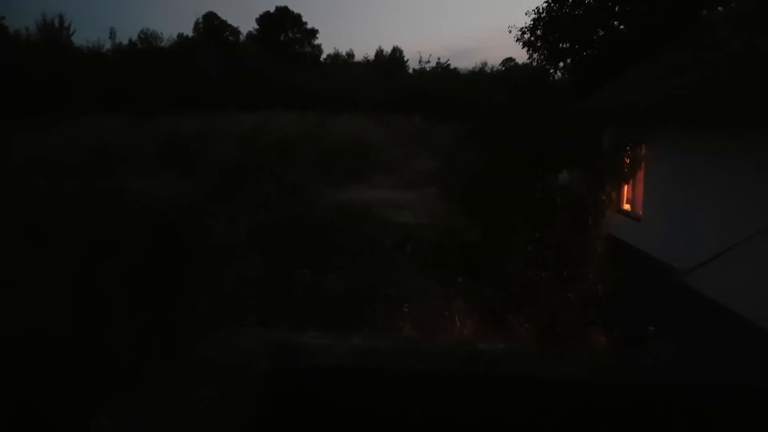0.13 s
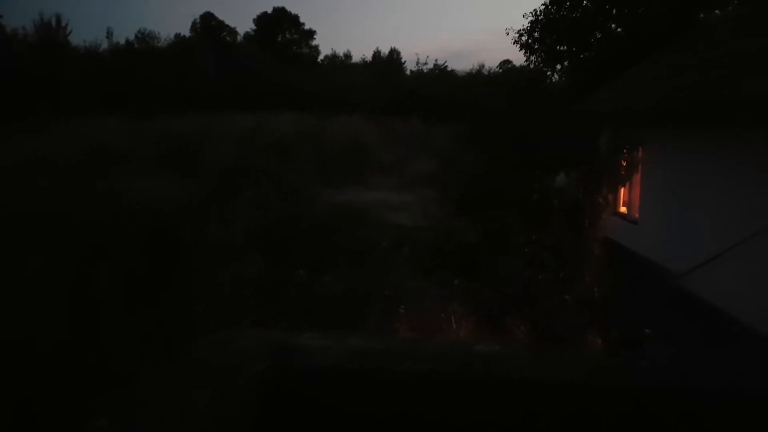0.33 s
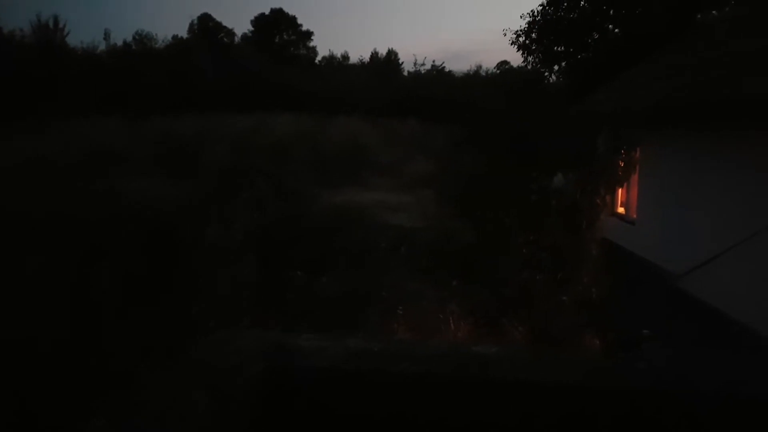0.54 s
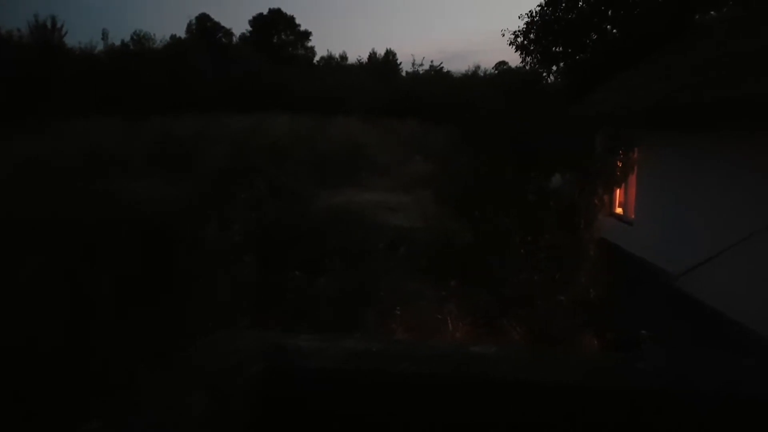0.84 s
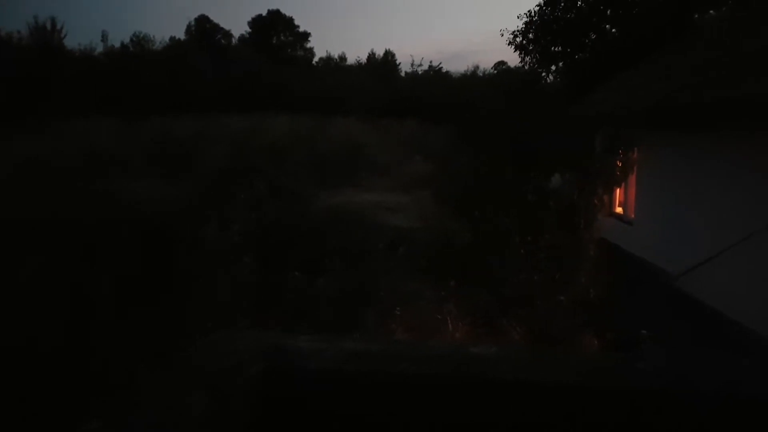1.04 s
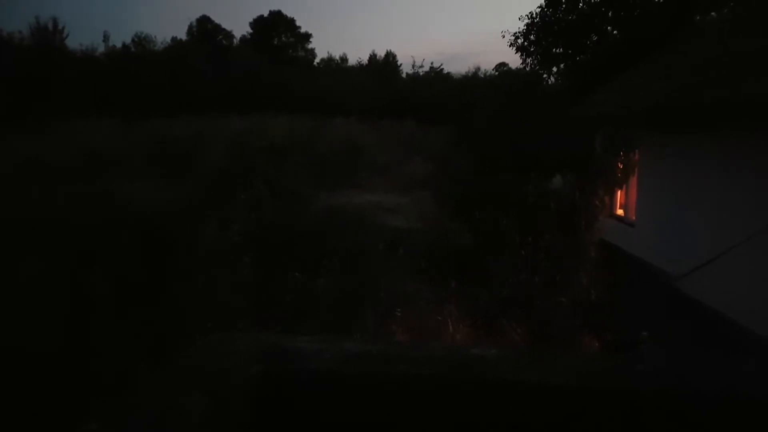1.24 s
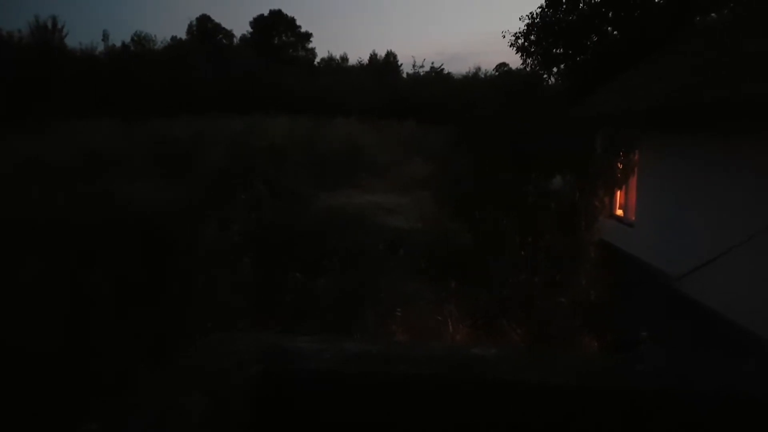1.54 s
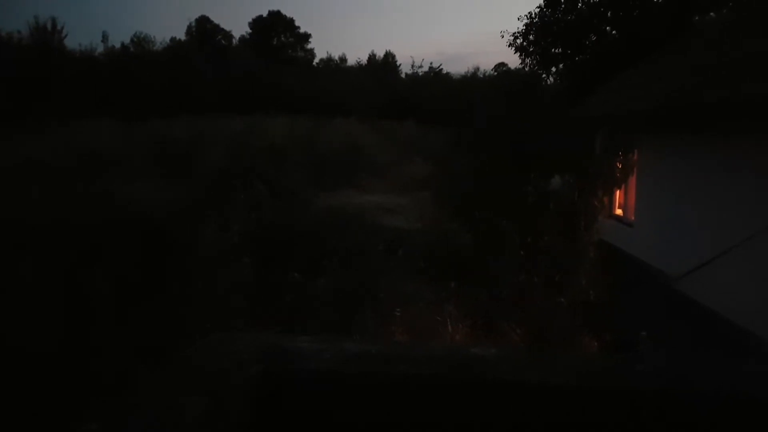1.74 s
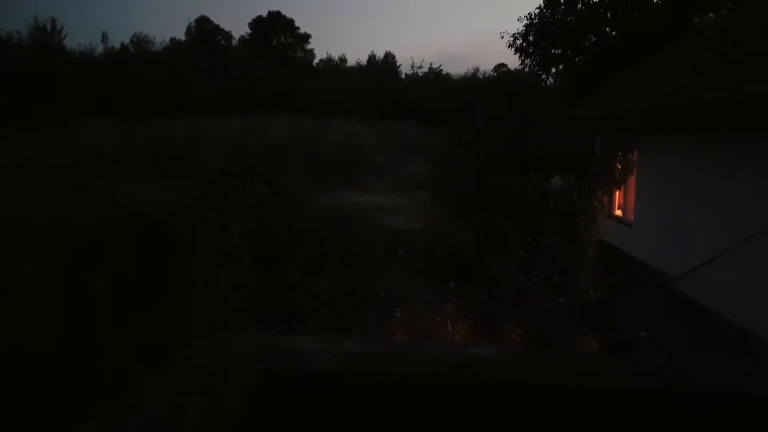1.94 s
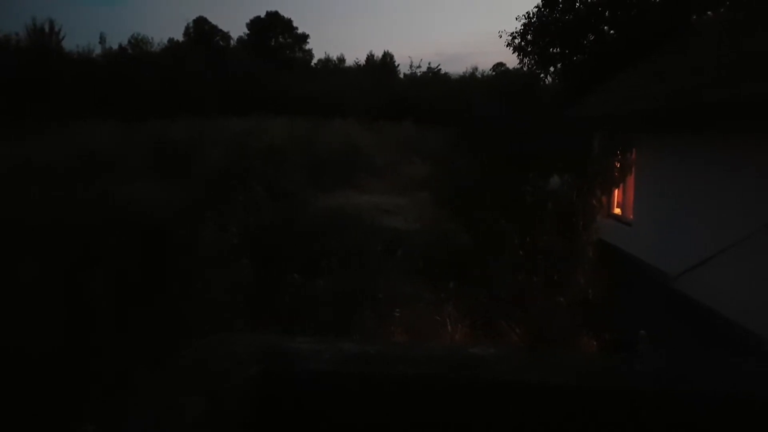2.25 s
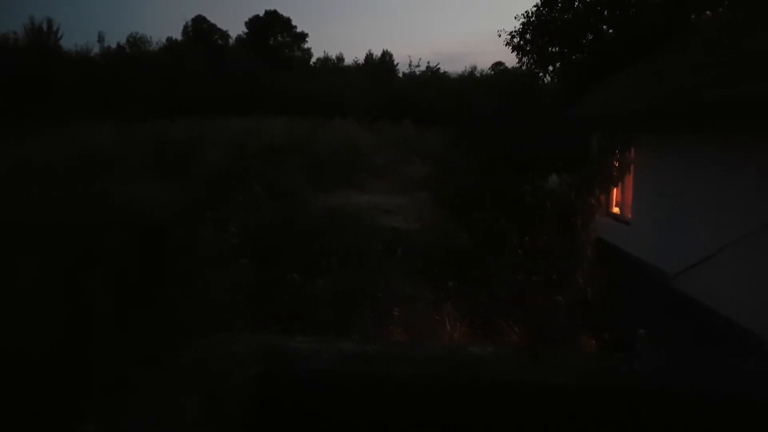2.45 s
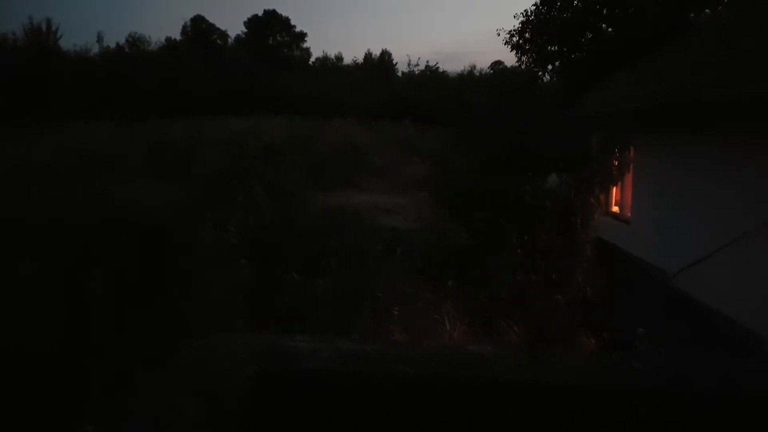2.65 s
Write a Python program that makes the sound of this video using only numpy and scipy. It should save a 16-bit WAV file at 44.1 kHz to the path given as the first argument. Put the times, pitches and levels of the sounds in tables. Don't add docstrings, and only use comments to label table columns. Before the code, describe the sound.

Tree crickets trill softly in overlapping bouts across a quiet garden at dusk, with faint hiss

```python
import sys
import numpy as np
from scipy import signal
from scipy.fft import rfft, irfft, next_fast_len
from scipy.io import wavfile
from scipy.ndimage import map_coordinates

SR = 44100
rng = np.random.default_rng(int(sys.argv[2]) if len(sys.argv) > 2 else 0)


def natural_amplitude(level_db):
    exponent = np.asarray(level_db, float) / 20
    return 10 ** exponent


def dump(signal):
    limited = np.clip(np.atleast_2d(signal).T, -1, 1)
    pcm = np.round(limited * 32767).astype(np.int16)
    wavfile.write(sys.argv[1], SR, pcm)


N = 123039

# singer, start in seconds, length in seconds, level in dB, left over right in dB.
TRILLS = [("a", -.3, .52, -73, -4), ("b", -.1, .32, -76.5, -5), ("c", -.2, .53, -79, -3),
          ("d", .22, .34, -78, -3), ("e", .47, .12, -81, -4), ("a", .54, .28, -75, -9),
          ("d", .58, .45, -79.5, 2), ("a", .8, .25, -77, -5), ("f", .74, .3, -81, -2),
          ("b", 1.03, .3, -78.5, -3), ("a", 1.2, .72, -76, 0), ("b", 1.38, .55, -74.5, -8),
          ("c", 1.74, .58, -80, 1), ("a", 1.95, .55, -79.5, -4), ("g", 2.34, .3, -80, 1),
          ("a", 2.47, .45, -73, -6), ("b", 2.52, .4, -76, -6), ("h", 2.5, .24, -79, -3)]
WING_HZ = dict(a=2515, b=2566, c=2710, d=2540, e=2760, f=2620, g=2460, h=2655)
# start in seconds, length in seconds, gap between clicks in seconds, level in dB.
ZIPS = [
    (.33, .03, .006, -65),
    (.645, .045, .006, -59.5),
    (1.1555, .038, .0054, -53.5),
    (1.262, .02, .006, -59.5),
    (2.12, .02, .006, -63),
    (2.5232, .045, .014, -51),
]
# multiple of the fundamental, level in dB, phase wander in radians.
HUM_ORDERS = [
    (2, -8.5, 1.5),
    (3, -1.5, 0.21),
    (4, -11, 1.4),
    (6, -12.5, 1.8),
]
# frequency in Hz, level in dB.
RUMBLE = [(15, -65), (30, -8), (50, -0.5), (75, -6), (140, -3.5), (260, -7), (450, -13.5), (900, -43.5)]
# frequency in Hz, correlation from 0 to 1.
RUMBLE_ALIKE = [(30, .85), (55, .6), (80, .2), (150, .4), (400, .1)]
# frequency in Hz, level in dB.
HISS = [(60, -16.5), (300, 1), (2100, -5), (3300, -10), (6000, -18), (9500, -21.5), (12500, -16),
        (15500, -12.5)]
OFFSET = [
    [-.00038],
    [-.0004],
]

STROKES_PER_S, FASTER_PER_HZ, REFERENCE_HZ = 33, .025, 2512
SOUNDING = .68
SAG_HZ, SCATTER_DB, SLIP_RAD, UNEVEN = 100, 1.5, 1.3, .05
SWELL_S, FADE_S, OVERTONE_DB = 0.026, 0.025, -28.5
NEAR_DB = -0.5
FAR_LOW_HZ, FAR_HIGH_HZ, FAR_DB, FAR_BOUT_S = 2410, 2830, -90, .55
LEAVES_T60_S, LEAVES_DB = .22, -.5
HUM_HZ, HUM_DB, HUM_LEFT_DB = 61.65, -77.5, -5.5
RUMBLE_DB = -73.5
WIND_FILTER_DB, HUM_FREE_S, RUMBLE_FREE_S = -14.5, .26, 0.51
HISS_DB, HISS_LEFT_DB = -69.5, -1.3
HISS_SETTLE_DB, HISS_SETTLE_S = 0.66, .8
ZIP_HZ, ZIP_T60_S, ZIP_RASP_DB, FAST_GAP_S, ZIP_LEFT_DB = 15200, .0016, -24, .006, -3
TOP_HZ = 15770


def unit(x):
    return x / np.sqrt(np.mean(x ** 2) + 1e-20)


def along(points, hz):
    f, v = np.transpose(points)
    return np.interp(np.log(hz + 1), np.log(f + 1), v)


def wobble(rate):
    return map_coordinates(rng.standard_normal(300), [np.arange(N) * rate / SR])


def sides(left_db):
    return natural_amplitude(np.array([[left_db / 2], [-left_db / 2]]))


def rush(spectrum, alike):
    m = next_fast_len(N)
    hz = np.fft.rfftfreq(m, 1 / SR)
    turn = np.arccos(np.clip(along(alike, hz), -1, 1)) / 2
    noise = rfft(rng.standard_normal((2, m)))
    coloured = noise * natural_amplitude(along(spectrum, hz)) * [np.cos(turn), np.sin(turn)]
    mid, side = irfft(coloured, m)[:, :N]
    return unit(np.array([mid + side, mid - side]))


def leaves(x):
    t = np.arange(SR // 3) / SR
    tail = rng.standard_normal((2, len(t))) * natural_amplitude(-60 * t / LEAVES_T60_S)
    tail = natural_amplitude(LEAVES_DB) * tail / np.linalg.norm(tail[0])
    tail[[0, 1], rng.integers(0, 18, size=2)] += 1
    heard = signal.fftconvolve(x[None], tail, axes=1)
    return heard * np.linalg.norm(x) / np.linalg.norm(heard, axis=1, keepdims=True)


def trill(hz, start, length, db, left_db):
    t = np.arange(SR) / SR
    knots = rng.standard_normal((80, 3))
    rate = STROKES_PER_S + FASTER_PER_HZ * (hz - REFERENCE_HZ)
    strokes = 1 + t * rate + UNEVEN * np.interp(t * rate / 2, np.arange(80), knots[:, 2])
    k = strokes.astype(int)
    within = strokes % 1
    pitch = hz + SAG_HZ * (SOUNDING / 2 - within)
    phase = 2 * np.pi * np.cumsum(pitch) / SR + SLIP_RAD * np.cumsum(knots[:, 0])[k]
    pulse = np.abs(np.sin(np.pi * np.clip(within / SOUNDING, 0, 1))) ** 0.53
    stroke = pulse * natural_amplitude(SCATTER_DB * knots[k, 1])
    tone = np.sin(phase) + natural_amplitude(OVERTONE_DB) * np.sin(2 * phase)
    bout = np.clip(t / SWELL_S, 0, 1) * np.clip((length - t) / FADE_S, 0, 1)
    sound = leaves(bout * unit(stroke * tone))
    out = np.zeros((2, N + 3 * SR))
    out[:, SR + round(start * SR):][:, :sound.shape[1]] = natural_amplitude(db) * sides(left_db) * sound
    return out[:, SR:SR + N]


def near_crickets():
    return natural_amplitude(NEAR_DB) * sum(trill(WING_HZ[name], *rest) for name, *rest in TRILLS)


def far_chorus():
    chance = rng.uniform(size=(50, 3))
    starts = np.linspace(-.5, N / SR, len(chance))
    out = np.zeros((2, N))
    for start, (louder, place, higher) in zip(starts, chance):
        hz = FAR_LOW_HZ + (FAR_HIGH_HZ - FAR_LOW_HZ) * higher ** 1.5
        out += trill(hz, start, FAR_BOUT_S, FAR_DB + 4 * louder, 8 * place - 8)
    return out


def wind_filter(free_s):
    return natural_amplitude(WIND_FILTER_DB * np.exp(-(np.arange(N) / SR / free_s) ** 2))


def hum():
    phase = 2 * np.pi * np.cumsum(HUM_HZ + .05 * wobble(3.3)) / SR
    lines = np.zeros((2, N))
    for side in range(2):
        for k, db, wander in HUM_ORDERS:
            level = natural_amplitude(db + 1.2 * wobble(4))
            lines[side] += level * np.sin(k * phase + 1.2 * side + wander * wobble(9))
    return natural_amplitude(HUM_DB + 3.5) * sides(HUM_LEFT_DB) * lines


def air_rumble():
    return natural_amplitude(RUMBLE_DB + 0.4 * wobble(2.1)) * rush(RUMBLE, RUMBLE_ALIKE)


def hiss():
    settling = HISS_SETTLE_DB * np.exp(-(np.arange(N) / SR / HISS_SETTLE_S) ** 2)
    return natural_amplitude(HISS_DB + settling) * sides(HISS_LEFT_DB) * rush(HISS, [(100, 0.0037)])


def bush_cricket():
    out = np.zeros((2, N))
    t = np.arange(SR // 10) / SR
    u = t[:400]
    ring = np.sin(2 * np.pi * ZIP_HZ * u) * natural_amplitude(-60 * u / ZIP_T60_S) * (1 - np.exp(-u / .0002))
    for start, length, gap, db in ZIPS:
        strikes = np.diff(np.floor(t / gap), prepend=-1) > 0
        teeth = strikes * natural_amplitude(1.5 * rng.standard_normal(len(t)))
        rasp = natural_amplitude(ZIP_RASP_DB) * FAST_GAP_S / gap * rng.standard_normal((2, len(t)))
        swell = np.sin(np.pi * np.clip((t + gap) / (length + 2 * gap), 0, 1))
        sound = signal.fftconvolve(swell * (teeth + rasp), ring[None], axes=1)
        out[:, round(start * SR):][:, :len(t)] += natural_amplitude(db) * sound[:, :len(t)]
    return sides(ZIP_LEFT_DB) * out


def scene():
    insects = near_crickets() + far_chorus() + bush_cricket()
    bass = wind_filter(HUM_FREE_S) * hum() + wind_filter(RUMBLE_FREE_S) * air_rumble()
    return insects + bass + hiss()


def band_limit(x):
    return signal.sosfilt(signal.butter(12, 16480, fs=SR, output="sos"), x)


def record(dry):
    m = next_fast_len(N)
    passed = np.fft.rfftfreq(m, 1 / SR) < TOP_HZ
    limited = irfft(rfft(dry, m) * passed, m)[:, :N]
    return band_limit(limited + OFFSET)


dry = scene()
out = record(dry)
dump(out)
```